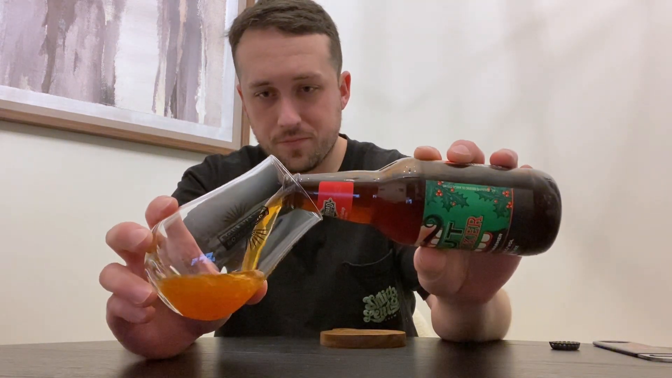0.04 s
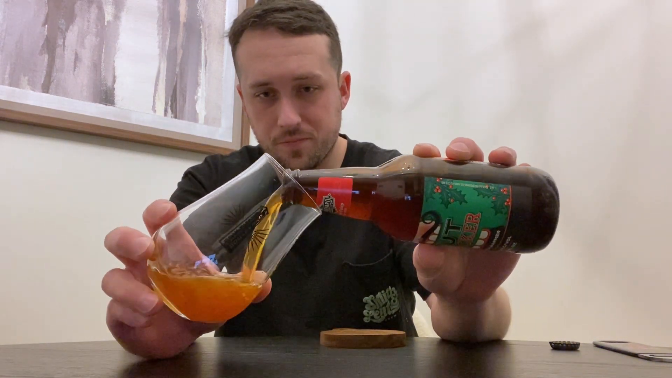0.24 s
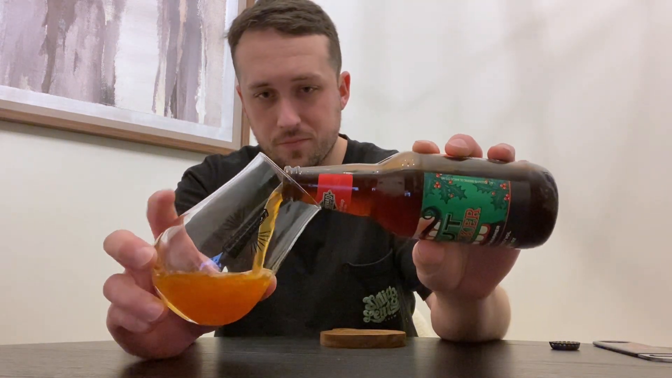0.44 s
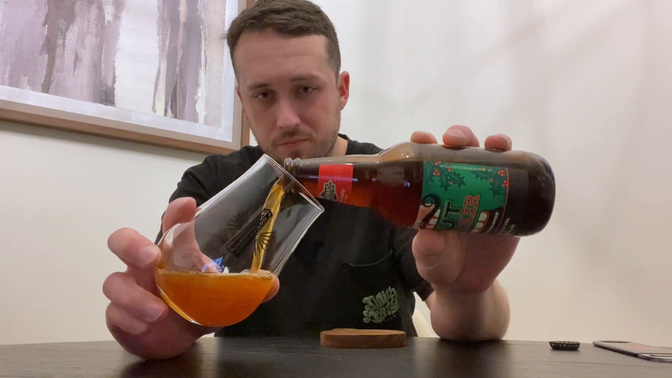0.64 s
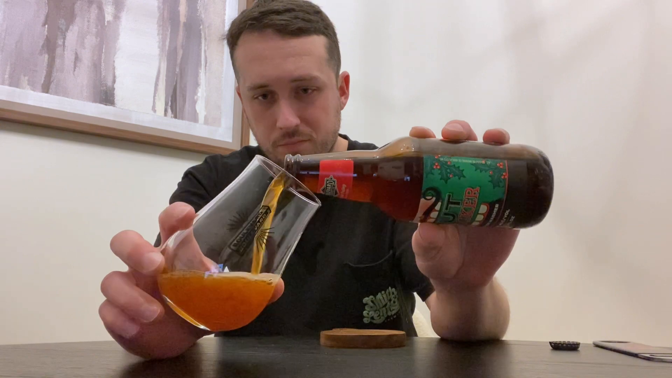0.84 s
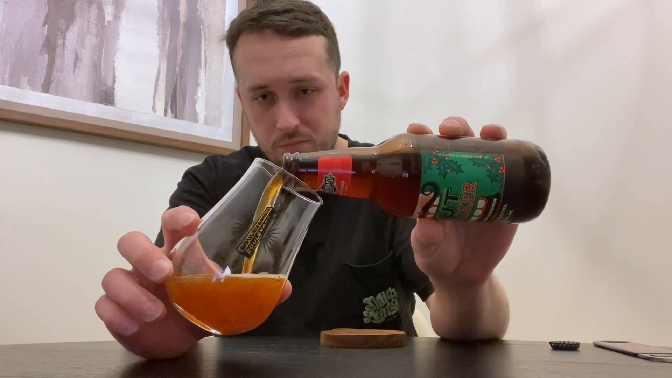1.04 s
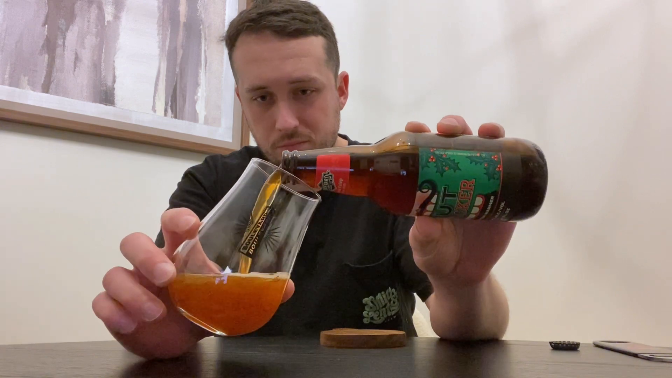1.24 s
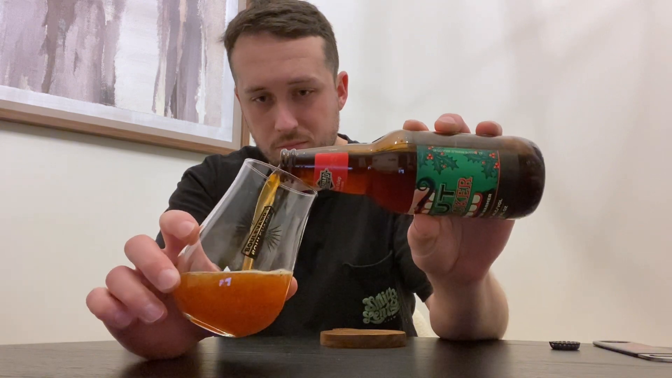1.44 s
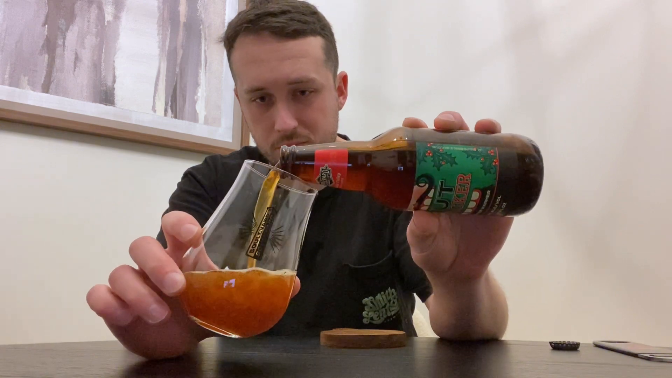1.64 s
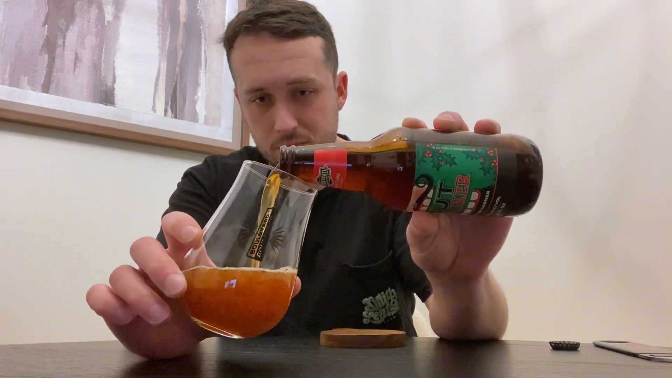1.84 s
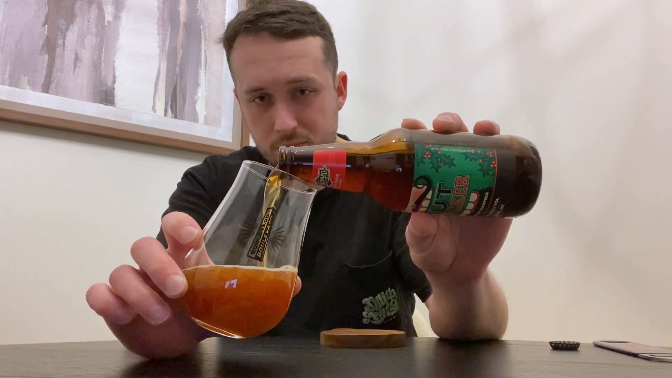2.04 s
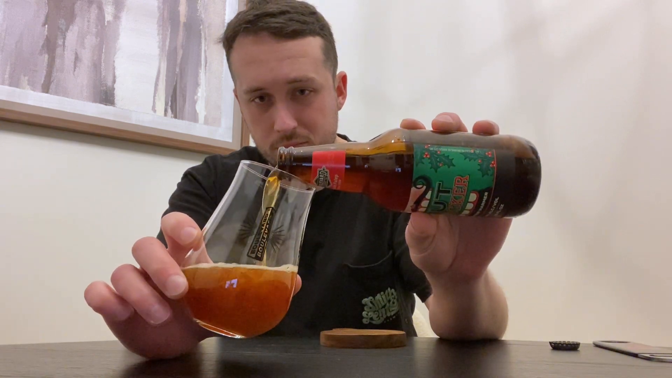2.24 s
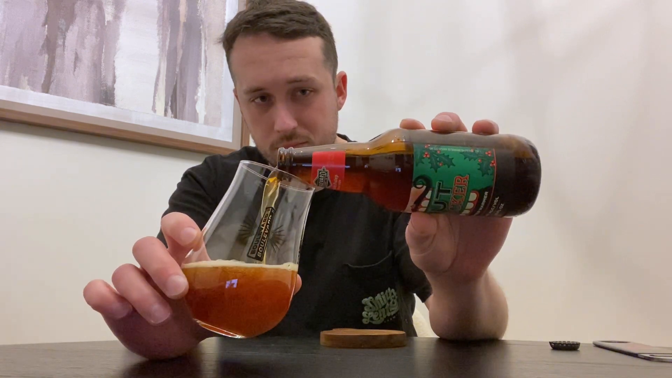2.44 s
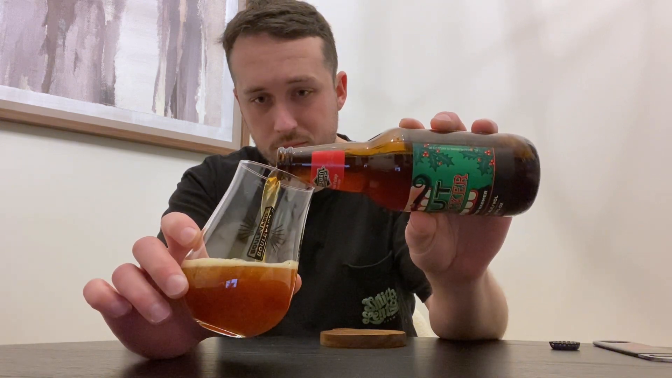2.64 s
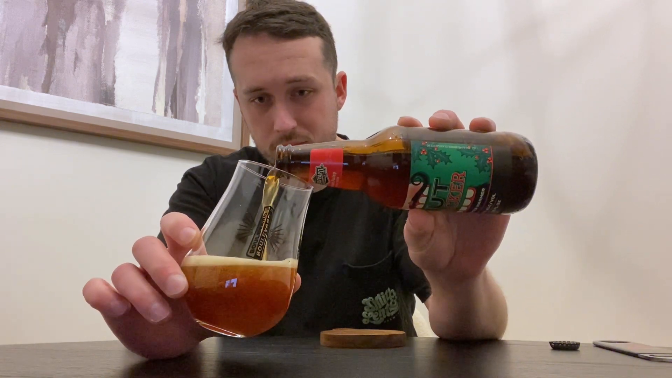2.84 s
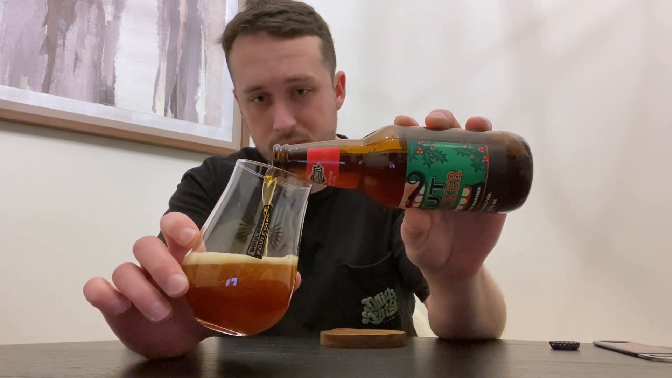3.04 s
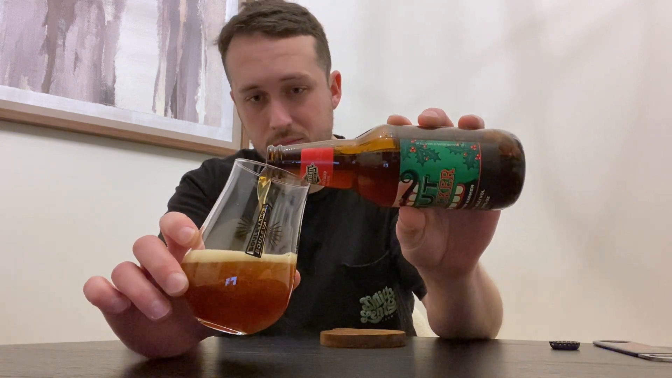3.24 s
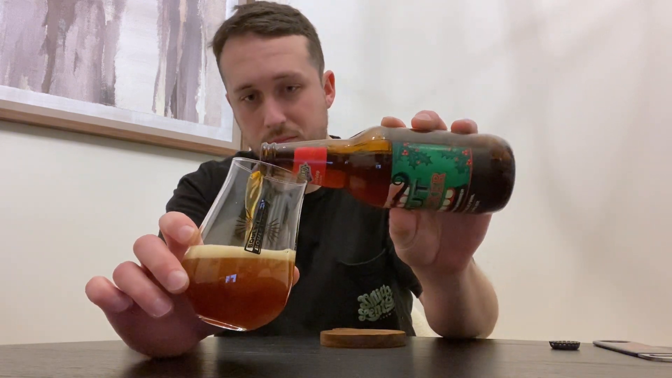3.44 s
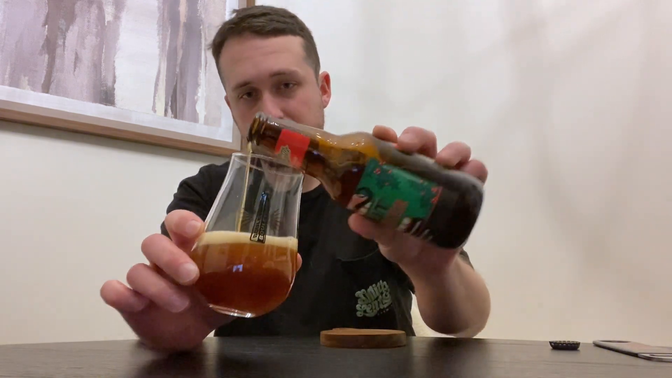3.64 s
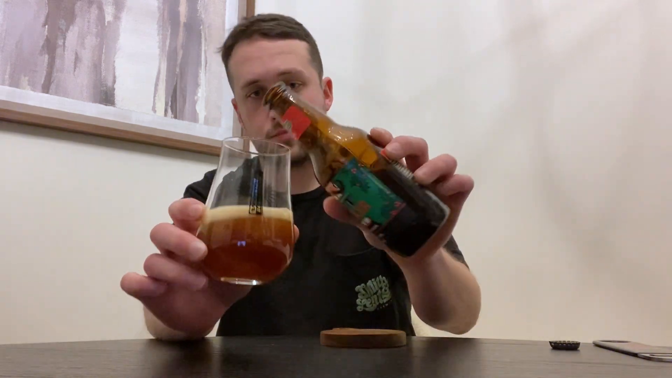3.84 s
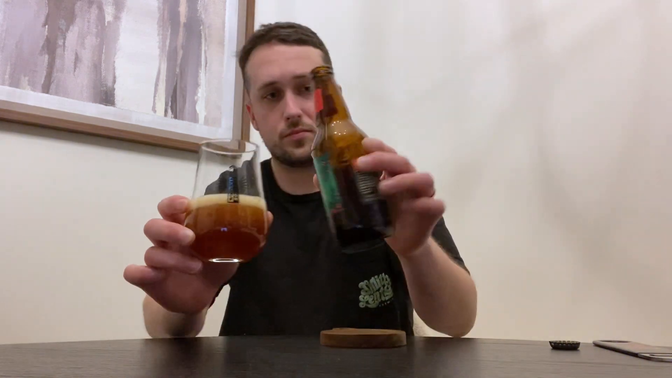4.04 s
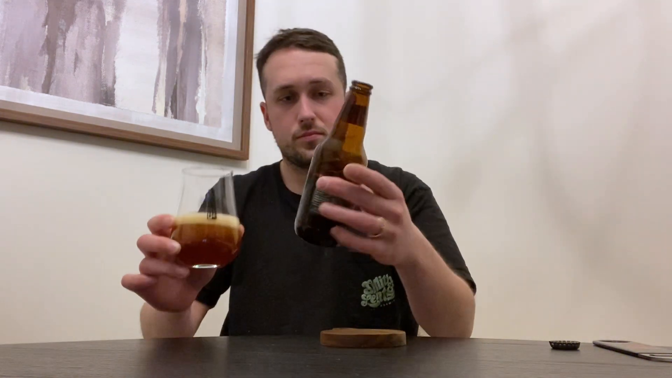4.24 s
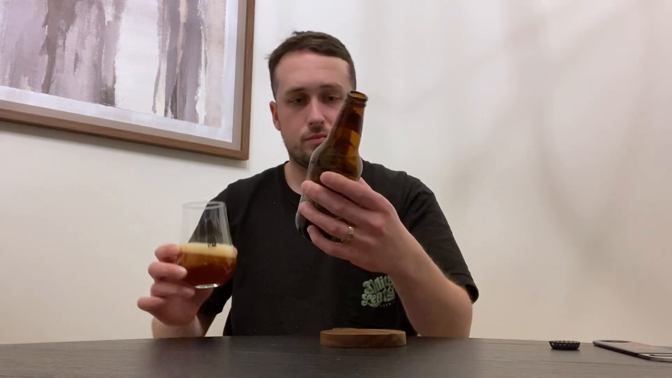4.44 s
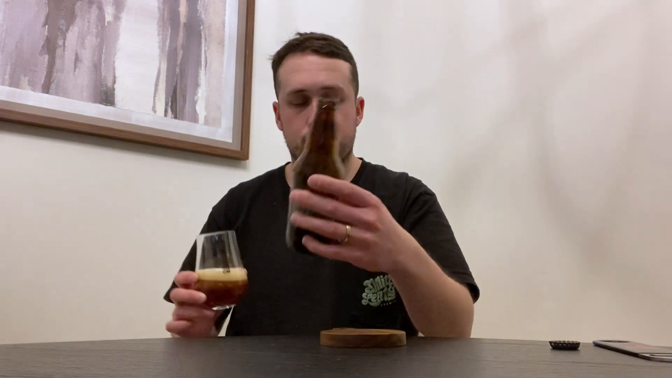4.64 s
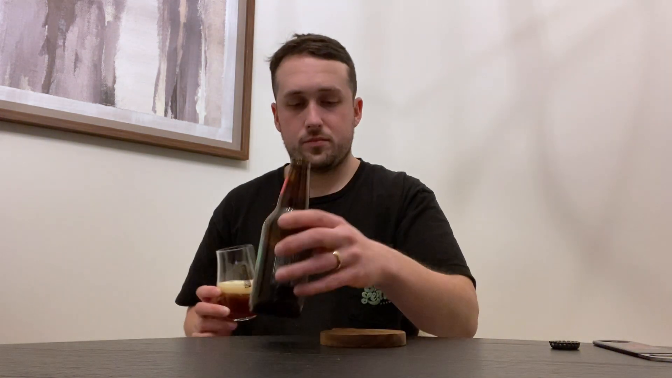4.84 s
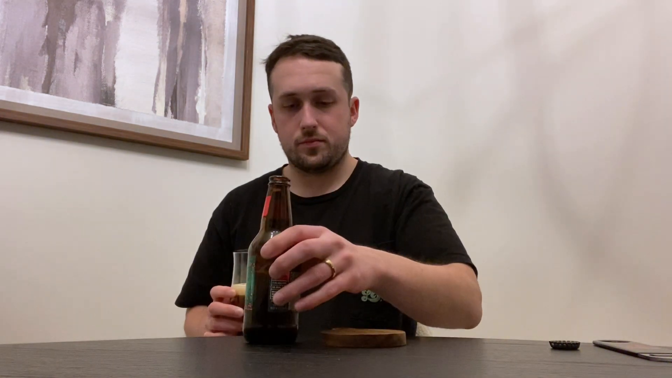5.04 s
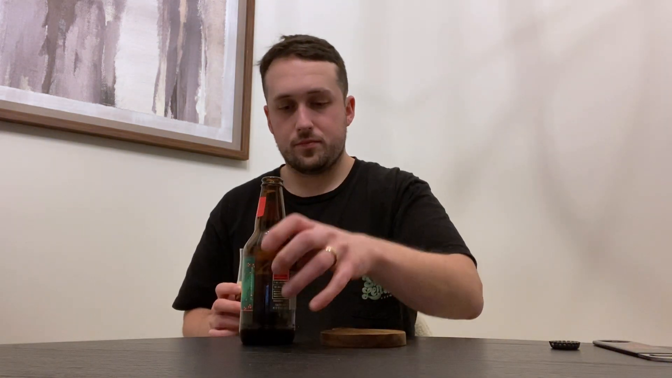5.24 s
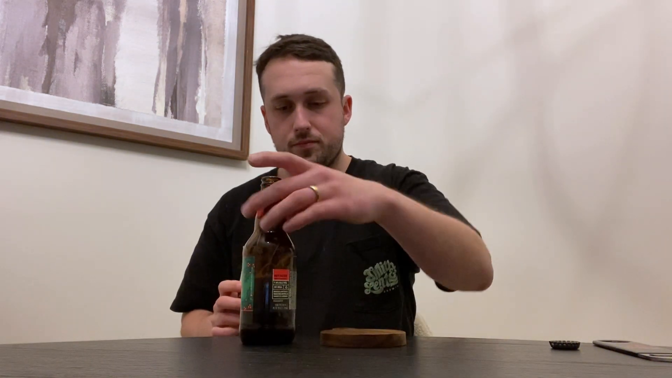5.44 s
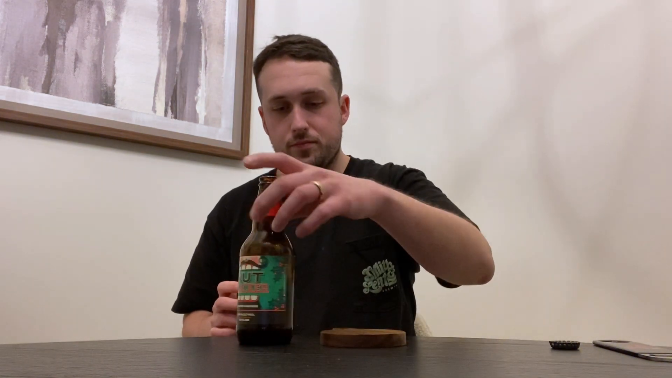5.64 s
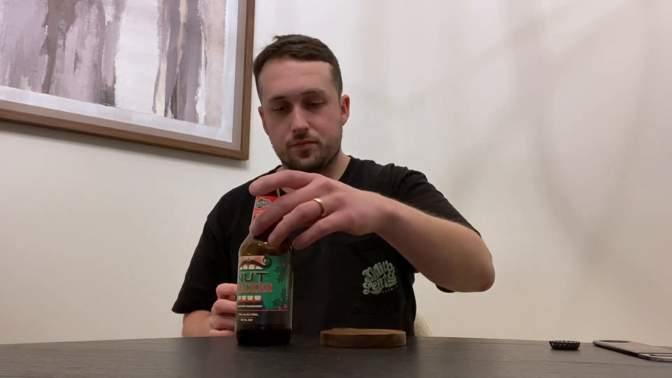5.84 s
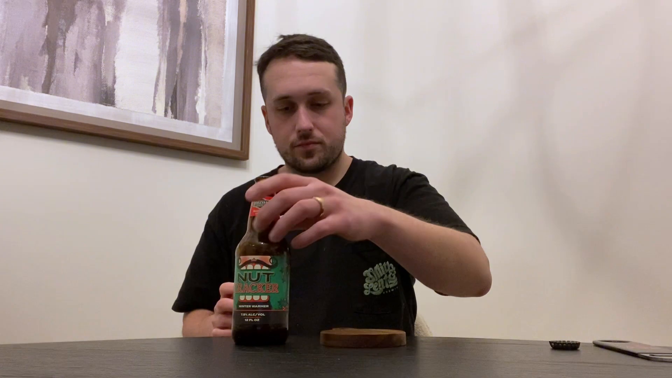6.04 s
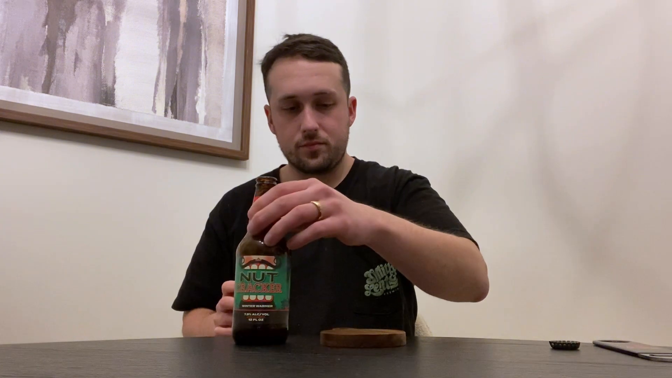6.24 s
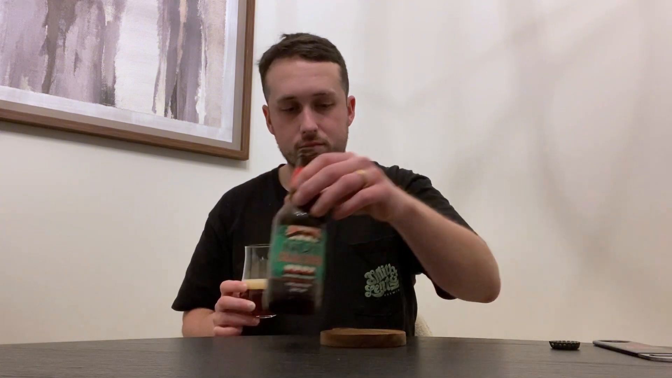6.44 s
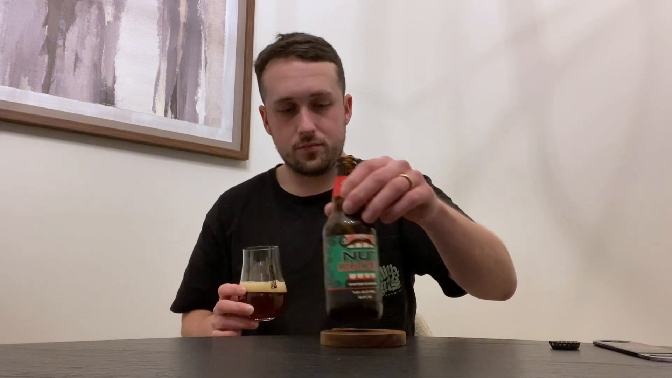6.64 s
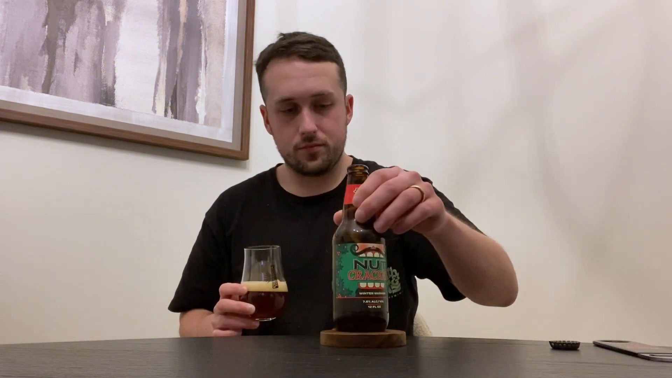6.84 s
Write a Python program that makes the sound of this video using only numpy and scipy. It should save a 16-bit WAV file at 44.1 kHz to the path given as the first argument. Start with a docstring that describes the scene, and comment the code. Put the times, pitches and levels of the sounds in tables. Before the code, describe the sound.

A small, quiet room with soft low room tone and a faint wavering appliance hum, heard by two close microphones. From 0 to 3.5 seconds beer trickles unevenly from a bottle into a glass: hollow glugs around the middle pitch, light wet splashes and, mostly in the first second, tiny high plinks on the glass wall. The flow is sparser after one second; from about 2.1 there are livelier, wetter plops, higher in pitch near 2.7. At 3.65 the neck clinks hard on the rim, a short bright ring with tiny rebounds, then a faint hiss until about 4.1. Near quiet follows. At 5.0 to 5.2 the bottle knocks and rattles on the wooden table; around 5.5 to 5.7 it drags with a low shuddering groan and glassy rasp, then softer scuffs and bumps until 6.3. At 6.8 it lands on a coaster with a loud, dry woody thump and glassy crack, dying quickly into the hum.

```python
"""Beer poured in a small room

Close by, beer trickles from a bottle into a glass: bubbles sound its air space and drops ring its wall.
The neck clinks on the rim as decaying modes; a hiss of shaped noise follows and stops short.
The bottle knocks, drags and shudders on a wooden table (pulses and stick-slip clicks into modes), then
lands on a coaster. A short room tail, room tone and an appliance hum lie behind, in two microphones."""
import sys
import numpy as np
from scipy import signal
from scipy.fft import rfft, irfft
from scipy.io import wavfile
from scipy.ndimage import uniform_filter1d

SR = 44100
rng = np.random.default_rng(int(sys.argv[2]) if len(sys.argv) > 2 else 0)


def wav_out(sig):
    """Save sig, one row per channel (or a flat mono array), as 16-bit PCM at SR to the path in sys.argv[1]."""
    wavfile.write(sys.argv[1], SR, np.round(np.clip(np.atleast_2d(sig).T, -1, 1) * 32767).astype(np.int16))


N = 304385  # samples

# room tone spectrum, before levelling: f/Hz, density/dB
AIR_SPECTRUM = [(15, -37), (25, -18.5), (54, -10), (164, -3.5), (219, 3), (278, -10.5), (436, -4),
                (498, -12.5), (616, -12.5), (761, -21), (1730, -28.5), (2500, -42), (8470, -55),
                (10500, -65.5), (14000, -83)]
AIR_DB = -46.5  # rms over both microphones
# likeness of the room tone at the two microphones: f/Hz, likeness/1
AIR_LIKENESS = [(60, 0.92), (150, 1), (300, 0.38), (500, 0.021), (6000, 0.028), (8300, 1)]
# lean of the room tone: f/Hz, left minus right/dB
AIR_LEAN = [(60, -5), (230, 2), (910, -1.5), (3550, -3), (13800, 1)]
# appliance hum lines, before they waver: f/Hz, rms level/dB, left minus right/dB, lead of right/rad
HUM_LINES = [(57.8, -55, 1.5, 0.27), (54.2, -66, -9, 1.5), (87.6, -64.5, -4, -0.016),
             (106.8, -58.5, 0, 1.1), (134.6, -56, -0.5, 0.055), (177, -60.5, 5, 0.62),
             (218.7, -57, -7, 1.56), (214.7, -51.5, -7.5, 0.89), (271, -59.5, 6.5, 0.72),
             (325.6, -58, -13, -0.24), (378.3, -60.5, -9.5, 1.3), (433.6, -60.5, -14.5, 0.18),
             (653, -64.5, -6, -2.2)]

# the stream into the glass, before its spurts: t/s, gurgle level/dB, patter level/dB
POUR = [(0.0, -64, -58), (0.1, -74, -71), (0.25, -53.5, -61), (0.42, -68, -78), (0.55, -59, -68),
        (0.64, -63, -77), (0.73, -46, -66), (0.82, -72, -80), (0.92, -58, -65), (1.1, -70, -75.5),
        (1.3, -61, -74), (1.8, -71, -76), (2.1, -80, -80), (2.3, -80, -84), (2.75, -68, -80.5),
        (3.1, -71, -79), (3.25, -70, -75), (3.5, -63, -75.5)]
# glass wall under the stream: f/Hz, width/Hz, level/dB
GLASS_WALL = [(2250, 200, -4), (2690, 37, -2), (3000, 160, -0.5), (4000, 1500, -7), (4870, 140, -1),
              (5640, 310, 0), (6200, 380, -12), (7940, 760, -9.5)]
# glugs: t/s, level/dB, bubble f/Hz, t60/s
GLUGS = [(0.207, -49, 605, 0.43), (0.322, -28.5, 630, 0.1), (0.323, -38.5, 1073, 0.068),
         (0.477, -34, 653, 0.16), (0.57, -38, 667, 0.085), (0.572, -49, 1050, 0.047),
         (0.666, -43.5, 655, 0.077), (0.701, -35.5, 646, 0.29), (0.765, -51, 630, 0.11),
         (0.876, -45, 636, 0.34), (0.976, -44, 653, 0.046), (1.256, -44.5, 665, 0.066),
         (1.522, -37, 550, 0.039), (1.582, -38.5, 646, 0.049), (1.65, -44, 676, 0.027),
         (1.786, -31, 630, 0.014), (1.797, -33, 735, 0.022), (1.862, -36, 660, 0.01),
         (2.11, -30, 470, 0.046), (2.112, -40.5, 990, 0.022), (2.141, -38, 905, 0.029),
         (2.143, -33, 500, 0.036), (2.168, -33, 485, 0.032), (2.169, -38, 940, 0.014),
         (2.175, -35.5, 840, 0.053), (2.277, -43, 647, 0.1), (2.426, -36.5, 857, 0.056),
         (2.465, -37, 653, 0.038), (2.514, -31.5, 873, 0.029), (2.646, -42.5, 880, 0.053),
         (2.701, -34, 847, 0.057), (2.722, -37.5, 930, 0.033), (2.775, -42, 667, 0.034),
         (2.876, -34, 844, 0.043), (2.97, -30.5, 848, 0.032), (3.031, -49, 966, 0.11),
         (3.065, -33, 825, 0.013), (3.155, -41, 830, 0.069)]
# splashes: t/s, level/dB, centre f/Hz, level of the upper wall's ring/dB
SPLASHES = [(0.012, -73, 2500, -59.5), (0.148, -51.5, 2690, -84), (0.286, -61, 2660, -58),
            (0.477, -48.5, 2070, -86), (0.475, -47, 1340, -90), (0.205, -58, 2860, -83),
            (0.5528, -46.5, 2200, -72), (0.555, -47, 1360, -90), (0.578, -49, 2630, -77),
            (0.603, -53, 2690, -74), (0.682, -64, 2180, -76), (0.717, -56, 3160, -86),
            (0.761, -50, 2930, -81), (0.761, -58, 1740, -94), (0.869, -55, 2450, -79),
            (0.917, -58, 2830, -76), (1.1174, -56, 2250, -89), (1.193, -51, 3000, -91),
            (1.221, -57, 2950, -90), (1.24, -56, 2930, -90), (1.256, -52, 3000, -88),
            (1.268, -57, 3050, -90), (1.345, -62, 3000, -90), (1.3997, -59, 2120, -83),
            (1.455, -54, 2100, -90), (1.835, -54, 2500, -92), (2.1102, -38.5, 2620, -56),
            (2.148, -61, 2700, -85), (2.178, -59, 2700, -87), (2.195, -51, 2730, -85),
            (2.205, -62, 2700, -88), (2.2237, -53, 2930, -79), (2.231, -57, 3100, -86),
            (2.277, -53, 2720, -90), (2.293, -62, 2870, -90), (2.31, -62, 2750, -90),
            (2.431, -48, 2820, -62), (2.464, -54, 2860, -85), (2.515, -44.5, 2560, -57),
            (2.645, -61, 3020, -79), (2.7214, -45, 2630, -75), (2.75, -58, 3000, -78),
            (2.772, -55, 2870, -86), (3.033, -55, 2680, -80), (3.065, -55, 2760, -66),
            (3.161, -60, 2570, -80), (3.337, -51, 2380, -72), (3.34, -61, 3330, -75)]
# plinks of single drops high on the wall: t/s, level/dB, f/Hz
PLINKS = [(.0373, -49, 6210), (.04, -62, 4950), (.0937, -65, 4940), (.1545, -56, 6200), (.1984, -58, 4920),
          (.2448, -55, 4950), (.2862, -59, 4900), (.297, -49, 6120), (.401, -67, 4870), (.405, -61, 6300),
          (.4863, -70, 6300), (.5127, -63, 6200), (.5526, -59, 4860), (.555, -62, 6240), (.5796, -49, 4960),
          (.6823, -50, 4910), (.685, -56, 6200), (.7213, -47, 4900), (.7677, -65, 6200), (.8475, -55, 4890),
          (.85, -53, 6100), (.9448, -54, 4970), (.9632, -59, 4990), (.9767, -49, 5000)]
PLINK_WIDTH_HZ, PLINK_T60_S, PLINK_TICK_DB = 200., .025, -8.5  # each starts with a wider, shorter tick
AIR_SPACE_HZ, FILL_HZ_PER_S = 633.3, 13.2  # the air space of the glass rises in pitch as it fills
RIGHTED_S, RIGHTED_HZ, RIGHTING_S = 2.7, 182, 0.05  # the pitch steps up when the glass is righted
SWAY = .025  # the surface heaves, so the pitch sways by this share (rms)
SPURT_DB, SPURTS_PER_S = 4, 13  # the stream comes unevenly (rms, fastest rate)
UPPER_PATTER_DB, UPPER_FADE_DB_PER_S = -76.5, 14  # drops reach the upper wall less as the glass is righted
GLIDE_PER_S, GLIDE_SCATTER = .2, .25  # rise in pitch of a bubble, and how it differs
# a smaller bubble of chance size pops with each glug
SIDE_BUBBLE_HZ, SIDE_BUBBLE_DB, SIDE_BUBBLE_T60_S, SIDE_SCATTER = 970, -29, 0.018, 0.093
# the wet plop around each bubble; plops grow wetter on foam
PLOP_DB, PLOP_T60_S, PLOP_WIDTH_HZ, PLOP_GAIN_DB_PER_S = -14, 0.035, 430, 1.5
# splashes grow shorter and brighter as the beer falls on foam
SPLASH_T60_S, SHORTEN_PER_S, SPRAY_DB, BRIGHTEN_DB_PER_S = 0.038, 0.27, -31.5, 5.5
SPLASH_RING_DB, SPLASH_RING_T60_S = -10.5, 0.062  # the wall mode nearest to a splash
UPPER_RING_T60_S = 0.16

# decay of the room: f/Hz, t60/s
ROOM_DECAY = [(120, 0.64), (330, 0.27), (870, 0.49), (2300, 0.49), (6000, 0.34), (12000, 0.094)]
# likeness of the tail at the two microphones: f/Hz, likeness/1
ROOM_LIKENESS = [(150, 0.8), (300, 0.32), (700, 0.068), (3000, 0.21)]
FAR_HZ = 1300.  # the treble of small sounds hardly reaches the walls
THUD_HZ = 1100.  # of the ringing modes mostly the low ones fill the room

# table top: f/Hz, level/dB, t60/s, left minus right/dB, lead of right/rad
TABLE_MODES = [(134.8, -17.5, 0.33, 7, 6.5), (198, -24, 0.51, 4.5, -23), (250.2, 1.5, 0.15, 0, 1),
               (275.8, 2, 0.082, 0.5, 0), (311.4, -2, 0.082, 5, -4.5), (344, -2.5, 0.074, -14, 1),
               (383.6, 0.5, 0.11, 4, 1.55), (427, -17, 0.56, -5, -6), (467, -6, 0.14, 10, 2),
               (489, -4, 0.13, -9.5, -3.5), (579.5, 4, 0.057, -9.5, 0.1), (608.7, 4.5, 0.04, 15.5, -1.6),
               (630, -6.5, 0.15, -4.5, 1.5), (719, 1, 0.088, 2.5, -2.5), (807, -13, 0.087, -2.5, 1.2),
               (56.6, -16.5, 0.3, -2, -5)]
# knocks on the table: t/s, blow level/dB, contact/ms, crack level/dB
KNOCKS = [(3.609, -21.5, 4.8, -89), (5.025, -7.5, 0.59, -16), (5.052, -24.5, 0.84, -26),
          (5.079, -26, 0.66, -36.5), (5.111, -30, 1.3, -37.5), (5.137, -25, 0.74, -35),
          (5.164, -13, 0.73, -8), (5.175, -9.5, 0.97, -16.5), (5.439, -20.5, 2.3, -27),
          (5.491, -13.5, 0.25, -5), (5.556, -17.5, 0.82, -11), (5.608, -11.5, 1.03, -25),
          (5.822, -19.5, 2.3, -39), (5.996, -10.5, 3.6, -41), (6.132, -23, 2, -41.5),
          (6.169, -19, 1.47, -31.5), (6.532, -48, 0.71, -43), (6.788, -44, 1.3, -29),
          (6.792, -36, 1.3, -17.5), (6.799, -7, 2.8, -1.5), (6.808, -4, 0.92, -1), (6.82, -12, 0.13, -30)]
# crowded upper modes of wood and bottle base: f/Hz, density/dB
GRAIN_SPECTRUM = [(500, -29.5), (850, -11), (939, 0.5), (1020, 9.5), (1270, 4), (1610, -6.5), (1950, -6),
                  (2430, -11.5), (2800, -18.5), (4050, -30), (4660, -35.5), (9300, -51.5), (12100, -80),
                  (20500, -120)]
# bottle base under a knock: f/Hz, width/Hz, level/dB
BOTTLE_BASE = [(1940, 150, 6), (2450, 140, -2.5)]
# bottle wall, as it rings in the catches before their scatter: f/Hz, width/Hz, level/dB
BOTTLE_WALL = [(3050, 1500, 0.5), (3500, 460, -6), (4030, 100, 0.5), (4700, 1100, -8.5), (5220, 210, -4),
               (5500, 360, -5), (6130, 130, -13), (6370, 400, -13), (8500, 250, -19)]
# one list for each drag over the wood: t/s, pressure level/dB, grit level/dB
DRAGS = [
    [(5.03, -28.5, -54.5), (5.07, -25.5, -52), (5.09, -51, -64.5), (5.135, -39, -54.5), (5.165, -15.5, -44),
     (5.181, -25, -44.5), (5.241, -40.5, -56.5), (5.3, -45, -55.5)],
    [(5.43, -46, -54), (5.486, -27, -49.5), (5.508, -14.5, -27), (5.53, -15.5, -28), (5.57, -16, -29.5),
     (5.598, -18.5, -31.5), (5.61, -9.5, -30.5), (5.636, -23.5, -40), (5.694, -33, -53), (5.79, -48.5, -59)],
    [(5.81, -30, -51), (5.828, -29, -42), (5.868, -24.5, -39.5), (5.9, -33.5, -51.5), (5.94, -23.5, -46),
     (5.96, -40, -58), (5.99, -29, -49.5), (6.026, -37, -58), (6.09, -51.5, -78)],
    [(6.12, -41.5, -57.5), (6.138, -37, -64.5), (6.208, -36, -45), (6.24, -36, -67.5), (6.28, -51, -69)],
]
# shudders, when the slips lock to the main mode of the top: middle t/s, length/s, level/dB
SHUDDERS = [(5.043, 0.062, -26.5), (5.079, 0.032, -23), (5.14, 0.052, -32.5), (5.183, 0.056, -17),
            (5.219, 0.048, -25.5), (5.27, 0.037, -31), (5.457, 0.047, -26.5), (5.512, 0.048, -20),
            (5.559, 0.065, -14.5), (5.611, 0.043, -13.5), (5.65, 0.044, -19.5), (5.728, 0.072, -25.5),
            (5.842, 0.046, -27), (5.887, 0.064, -24), (5.953, 0.082, -27), (6.022, 0.053, -26),
            (6.157, 0.1, -34), (6.213, 0.067, -24)]
CHATTER_HZ, CHATTER_DRIFT_HZ = 254.4, 9.  # main mode of the top, and its rms drift
BASE_DB, BASE_PER_CRACK = -28.5, 0.63  # the bottle base rings with the crack
RASP_DB, RASP_PER_GRIT = -10.5, 1.5  # the glass rasps where the grit is strong
WALL_PER_BASE_DB = -26  # knocks ring the bottle wall too
WALL_WIDENING = 2.5  # wall modes are wider and die faster under rasp and knocks than in the catches

# clink of neck on rim: t/s, ring level/dB, shiver level/dB
CLINK_BLOWS = [(3.654, -8, -17.5), (3.6665, -18, -37), (3.692, -36, -40), (3.718, -45, -44),
               (3.745, -36.5, -52), (3.779, -39, -56)]
# modes of the clink: f/Hz, level/dB, t60/s
CLINK_MODES = [(135.6, -20.5, 0.24), (492, -3.5, 0.069), (555, -4, 0.056), (646, -7.5, 0.088),
               (895, -10, 0.061), (980, -14, 0.11), (1064, -5, 0.039), (1145, 1.5, 0.026),
               (1440, -1.5, 0.019), (1730, -5, 0.022), (1850, -4.5, 0.013), (2450, -11.5, 0.057),
               (2460, -33, 0.55), (2370, -25, 0.18), (2150, -35, 0.13), (2690, -23, 0.15),
               (3515, -7.5, 0.028), (3570, -40, 0.1), (3450, -37, 0.23), (4095, -16, 0.093),
               (4150, -25, 0.31), (4430, -29, 0.24), (5040, -8, 0.055), (5550, -8, 0.02),
               (6400, -49, 0.046), (6500, -27, .05), (7200, -32, 0.047), (9120, -28, 0.05),
               (11700, -40, 0.036), (12400, -28, 0.046)]
# moving beer makes each mode of the glass flutter, low modes less
SLOSH, SLOSH_SETS_IN_S, SLOSH_S, SLOSH_ABOVE_HZ = .9, .015, .009, 900.
# hiss while the bottle tips back: t/s, level/dB
HISS = [(3.7, -56), (3.85, -56.5), (4.02, -56.5), (4.045, -66), (4.2, -77)]
# colour of the hiss: f/Hz, density/dB
HISS_COLOUR = [(410, -30), (700, 1.5), (864, -2.5), (2380, -3.5), (2600, -12), (3420, -8), (5900, -22),
               (8200, -19), (10200, -32), (13500, -39)]

# dry ticks as fingers shift on the glass: t/s, level/dB, f/Hz
TICKS = [(5.427, -60.5, 4120), (5.459, -56, 4700), (5.782, -66.5, 4700), (5.792, -63.5, 4700),
         (6.12, -71, 4630), (6.133, -72, 4500)]
# drag catches, then the landing on the coaster, ring the bottle wall: t/s, level/dB
CATCHES = [(5.496, -51), (5.506, -51), (5.524, -49), (5.537, -48), (5.55, -41.5), (5.558, -39), (5.59, -53),
           (5.611, -36), (6.8036, -32), (6.808, -25.5), (6.809, -32), (6.8163, -40), (6.821, -45)]
CATCH_SCATTER_DB = 2.5  # each row favours other modes
CATCH_DETUNE = .025  # grip and tilt shift the modes a little from row to row
# blows on the coaster: t/s, ring level/dB, shiver level/dB
COASTER_BLOWS = [(6.7995, 0, -41.5), (6.805, -17, -16), (6.820, -43, -34)]
# modes of the coaster: f/Hz, level/dB, t60/s
COASTER_MODES = [(414, -5.5, 0.021), (551, 6.5, 0.021), (736, -11.5, 0.048), (1050, -23, 0.066),
                 (2040, 3, 0.0072)]

EDGE_HZ = 14100  # upper band limit
SIDES = np.array([[.5], [-.5]])  # left, right


def amp(db):
    """dB to gain."""
    return 10 ** (np.asarray(db) / 20)


def evened(x):
    """Scales to rms 1."""
    return x / np.sqrt(np.mean(x ** 2) + 1e-20)


def read(points, hz):
    """Reads a table on a log-frequency axis."""
    f, value = np.transpose(points)
    return np.interp(np.log(hz + 1), np.log(f + 1), value)


def curve(rows):
    """A gate that is 1 inside the table, then its columns at every sample."""
    s, *columns = np.transpose(rows)
    t = np.arange(N) / SR
    gate = uniform_filter1d(1. * ((t > s[0]) & (t < s[-1])), 200)
    return [gate] + [np.interp(t, s, c) for c in columns]


def add(mix, s, sound):
    """Mixes a sound in at s seconds."""
    part = mix[round(s * SR):][:len(sound)]
    part += sound[:len(part)]


def resonate(x, hz, width):
    """Shifts hz down to zero, smooths, shifts back: a resonance of gain 1."""
    turn = np.exp(2j * np.pi * np.cumsum(hz * np.ones(len(x))) / SR)
    r = np.exp(-np.pi * width / SR)
    return 2 * (turn * signal.lfilter([1 - r], [1, -r], x / turn)).real


def resonate_twice(x, hz, width):
    """Two equal resonances in a row give steeper skirts."""
    return resonate(resonate(x, hz, width), hz, width)


def ring(modes, rise_s=0.003, flutter=0):
    """Impulse response of decaying modes with a soft start, peak 1; flutter roughens the tail."""
    t, x = np.arange(SR // 2) / SR, 0
    smooth = int(SLOSH_S * SR)
    for hz, db, t60 in modes:
        share = flutter * (1 - np.exp(-t / SLOSH_SETS_IN_S)) / (1 + (SLOSH_ABOVE_HZ / hz) ** 2)
        chance = 0
        if flutter:
            noise = rng.standard_normal(len(t))
            chance = evened(uniform_filter1d(uniform_filter1d(noise, smooth), smooth))
        tone = amp(db - 60 * t / t60) * np.sin(2 * np.pi * hz * t)
        x = x + tone * (1 - share + share * chance)
    x *= 1 - np.exp(-t / rise_s)
    return x / abs(x).max()


def ring_of_peaks(peaks):
    """Ring of modes given by width: a wider mode dies faster."""
    return ring([(hz, db + 20 * np.log10(width), 2.2 / width) for hz, width, db in peaks], .0008)


def grains(per_s, spread_db):
    """Random clicks, a few of them large."""
    size = amp(spread_db * np.minimum(rng.exponential(1, N), 4)) * rng.choice([-1., 1.], N)
    return evened(size * (rng.random(N) < per_s / SR))


def wander(per_s):
    """Slow chance of rms 1, a sum of sines up to per_s."""
    t = np.arange(N // 64 + 2) * 64 / SR
    rates = np.geomspace(per_s / 15, per_s, 16)
    x = sum(np.sin(2 * np.pi * (f * t + rng.random())) / np.sqrt(f) for f in rates)
    return np.interp(np.arange(N) / SR, t, evened(x))


def puffs(rows, width_hz, t60):
    """Each row is a brief puff of noise in one resonance."""
    out, t = np.zeros(N), np.arange(1500) / SR
    for s, db, hz in rows:
        noise = rng.standard_normal(len(t))
        add(out, s, amp(db - 60 * t / t60) * evened(resonate_twice(noise, hz, width_hz)))
    return out


def air():
    """Room tone: random short-time spectra with faint patches."""
    frames, hz = N // 512 + 5, np.fft.rfftfreq(2048, 1 / SR)
    a, b, c, d, patches = rng.standard_normal((frames, 1025, 5)).T
    patches = evened(uniform_filter1d(uniform_filter1d(patches, 20, 0), 6, 1))
    same = np.clip(read(AIR_LIKENESS, hz), -1, 1)[:, None]
    left = a + 1j * b
    right = same * left + np.sqrt(1 - same ** 2) * (c + 1j * d)
    lean = read(AIR_LEAN, hz)[:, None] / 2
    z = np.array([left * amp(lean), right * amp(-lean)])
    z *= amp(read(AIR_SPECTRUM, hz)[:, None] + 1.72 * patches)
    return amp(AIR_DB) * evened(signal.istft(z, nperseg=2048, noverlap=1536)[1][:, :N])


def hum():
    """Appliance lines that waver in level and phase."""
    t, out = np.arange(N) / SR, np.zeros((2, N))
    for hz, db, lean_db, lead in HUM_LINES:
        turn = 2 * np.pi * hz * t + 0.75 * wander(7.)
        level = amp(db + SIDES * lean_db + 1.54 * wander(6.)) * np.sqrt(2)
        out += level * np.sin(turn - SIDES * lead)
    return out


def gurgle():
    """Small bubbles sound the air space of the glass, whose pitch rises as it fills."""
    t = np.arange(N) / SR
    hz = AIR_SPACE_HZ + FILL_HZ_PER_S * t + RIGHTED_HZ / (1 + np.exp((RIGHTED_S - t) / RIGHTING_S))
    hz *= 1 + SWAY * wander(SPURTS_PER_S)
    return evened(resonate(resonate(grains(700., 0.84), hz, 45.0), hz, 120.0))


def patter():
    """Drops on the lower and upper glass wall; each lands where it rings mostly one mode."""
    drops = []
    for hz, width, db in GLASS_WALL:
        clicks = resonate(grains(90., 3.5), hz, width)
        drops.append(amp(db) * evened(resonate(clicks, hz, 400. + width)))
    return evened(sum(drops[:4])), evened(sum(drops[4:]))


def upper_level():
    """Level of the upper wall: a fading patter, and a decaying burst at each splash."""
    level = amp(UPPER_PATTER_DB - UPPER_FADE_DB_PER_S * np.arange(N) / SR)
    t = np.arange(SR // 8) / SR
    for s, _, _, wall_db in SPLASHES:
        add(level, s, amp(wall_db - 60 * t / UPPER_RING_T60_S))
    return level


def plinks():
    """Single drops high on the wall: a narrow puff of noise under a wider tick."""
    tick = puffs(PLINKS, 2200., .012)
    return puffs(PLINKS, PLINK_WIDTH_HZ, PLINK_T60_S) + amp(PLINK_TICK_DB) * tick


def glugs():
    """Decaying bubble tones, most rising a little as they near the surface, each in a wet plop."""
    out, t = np.zeros(N), np.arange(SR // 8) / SR
    for s, db, hz, t60 in GLUGS:
        size, glide = rng.standard_normal(2)
        side_hz = SIDE_BUBBLE_HZ * (1 + SIDE_SCATTER * size)
        bent = t + (GLIDE_PER_S + GLIDE_SCATTER * glide) * t ** 2
        bubble = np.sin(2 * np.pi * hz * bent) * amp(-60 * t / t60)
        side = np.sin(2 * np.pi * side_hz * bent) * amp(SIDE_BUBBLE_DB - 60 * t / SIDE_BUBBLE_T60_S)
        add(out, s, amp(db) * (bubble + side) * (1 - np.exp(-t / 0.0022)))
        plop = evened(resonate_twice(rng.standard_normal(len(t)), hz, PLOP_WIDTH_HZ))
        add(out, s, amp(db + PLOP_DB + PLOP_GAIN_DB_PER_S * s - 60 * t / PLOP_T60_S) * plop)
    return out


def splashes():
    """Decaying noise with a bright spray and a landing tick; some ring the wall mode nearest to them."""
    out, t = np.zeros(N), np.arange(SR // 8) / SR
    for s, db, hz, _ in SPLASHES:
        noise = rng.standard_normal(len(t))
        low = evened(resonate(resonate(noise, hz, 230.0), hz, 930.0))
        spray = evened(resonate_twice(noise, 7500.0, 2200.0))
        t60 = SPLASH_T60_S * np.exp(-SHORTEN_PER_S * s)
        add(out, s, amp(db - 60 * t / t60) * (low + amp(SPRAY_DB + BRIGHTEN_DB_PER_S * s) * spray))
        tick = resonate_twice(noise, 2000., 4000.) * np.exp(-t / 0.0037)
        add(out, s, amp(db - 16.5) * tick)
        mode_hz = min((f for f, _, _ in GLASS_WALL), key=lambda f: abs(f - hz))
        if abs(mode_hz / hz - 1) < .1:
            decay = amp(db + SPLASH_RING_DB - 60 * t / SPLASH_RING_T60_S)
            add(out, s, decay * np.sin(2 * np.pi * mode_hz * t))
    return out


def pour():
    """The stream into the glass: gurgle and patter in spurts, with plinks, glugs and splashes."""
    gate, gurgle_db, patter_db = curve(POUR)
    spurts = amp(SPURT_DB * wander(SPURTS_PER_S))
    lower, upper = patter()
    out = gate * spurts * (amp(gurgle_db) * gurgle() + amp(patter_db) * lower)
    out += gate * upper_level() * upper
    out += plinks() + glugs() + splashes()
    # little is left in the top treble
    return signal.sosfilt(signal.butter(N=6, Wn=9300., fs=SR, output="sos"), out)


def room(x):
    """Sparse taps of random sign, each band dying at its own speed."""
    taps = np.zeros((2, SR // 2))
    at = np.arange(200, SR // 2 - 20, 20) + rng.integers(0, 20, (2, (SR // 2 - 201) // 20))
    np.put_along_axis(taps, at, rng.choice([-1., 1.], at.shape), 1)
    hz, t, z = signal.stft(taps, SR, nperseg=256)
    same = np.clip(read(ROOM_LIKENESS, hz), 0, 1)[:, None]
    z[1] = same * z[0] + np.sqrt(1 - same ** 2) * z[1]
    decay = amp(-60 * t / read(ROOM_DECAY, hz)[:, None])
    tail = signal.istft(z * decay, SR, nperseg=256)[1]
    return signal.fftconvolve(x[None], tail / np.linalg.norm(tail[0]), axes=1)[:, :N]


def grain():
    """Response of one spot of the top: crowded modes, soft start, quick decay."""
    t = np.arange(SR // 5) / SR
    chance = rng.standard_normal((2, len(t))) + 0.51 * rng.standard_normal(len(t))
    x = irfft(rfft(chance) * amp(read(GRAIN_SPECTRUM, np.fft.rfftfreq(len(t), 1 / SR))))
    x *= amp(-60 * t / 0.064) * (1 - np.exp(-t / 0.00039)) ** 2
    return x / np.linalg.norm(x[0])


def shudders():
    """Slips locked to the main mode of the top: a drifting tone that swells and fades."""
    swell = np.zeros(N)
    for s, length, db in SHUDDERS:
        add(swell, s - length / 2, amp(db) * np.hanning(int(length * SR)) ** 0.66)
    hz = CHATTER_HZ + CHATTER_DRIFT_HZ * wander(40.)
    locked = np.sqrt(2) * np.sin(2 * np.pi * np.cumsum(hz) / SR) * amp(1.1 * wander(30.))
    return swell * locked


def table():
    """Blows and stick-slip clicks push the table top, crack in its grain and ring the bottle."""
    push, rub, grit, glass, rasp = np.zeros((5, N))
    for s, db, ms, crack_db in KNOCKS:  # a longer contact gives a duller blow
        contact = np.hanning(int(ms * SR / 1000) + 3)
        add(push, s, amp(db) * contact / contact.sum())
        add(grit, s, amp([crack_db]))
        add(glass, s, amp([BASE_DB + BASE_PER_CRACK * crack_db]))
    slips, grits, rasps = grains(900., 2.8), grains(540.0, 3.26), grains(1200., 2.8)
    for rows in DRAGS:
        gate, db, grit_db = curve(rows)
        rub += gate * amp(db) * slips
        grit += gate * amp(grit_db) * grits
        rasp += gate * amp(RASP_DB + RASP_PER_GRIT * grit_db) * rasps

    t, modes = np.arange(SR // 2) / SR, []
    for hz, db, t60, lean_db, lead in TABLE_MODES:
        decay = amp(db + SIDES * lean_db - 60 * t / t60) * (1 - np.exp(-t / 0.0038))
        modes.append(decay * np.sin(2 * np.pi * hz * t - SIDES * lead))
    wood = sum(modes)
    dragged = wood - modes[2] - modes[3]  # the shudders play the two main modes under a drag
    blows = signal.oaconvolve(push[None], wood / abs(wood).max())[:, :N]
    rubbing = signal.oaconvolve(rub[None], dragged / np.linalg.norm(dragged[0]))[:, :N]

    spot = rng.integers(0, 5, N)  # the base meets the wood at changing spots
    cracks = sum(signal.oaconvolve((grit * (spot == k))[None], grain())[:, :N] for k in range(5))

    wall = ring_of_peaks([(hz, WALL_WIDENING * width, db) for hz, width, db in BOTTLE_WALL])
    wall_push = rasp / np.linalg.norm(wall) + amp(WALL_PER_BASE_DB) * glass
    bottle = signal.oaconvolve(glass + amp(-16.0) * rasp, ring_of_peaks(BOTTLE_BASE))[:N]
    bottle += signal.oaconvolve(wall_push, wall)[:N] + ticks()
    # a little nearer the right microphone: earlier and louder there
    bottle = np.array([np.roll(bottle, shift=2), bottle]) * amp([[-1.5], [1.5]])
    return blows + rubbing + shudders() + cracks + bottle


def strikes(blows, modes, rise_s, tick_db, shiver_t60, shiver_hz, flutter=0):
    """Each blow rings the modes, starts with a tick and shivers in modes too crowded to tell apart."""
    out, rough = np.zeros((2, N))
    body, t = ring(modes, rise_s, flutter), np.arange(SR // 5) / SR
    band = signal.butter(N=3, Wn=[1200., shiver_hz], btype="band", fs=SR, output="sos")
    for s, db, shiver_db in blows:
        noise = rng.standard_normal(len(t)) * (1 - np.exp(-t / rise_s))
        add(out, s, amp(db) * body)
        add(out, s, amp(db + tick_db) * np.gradient(noise) * np.exp(-t / 0.0003))
        add(rough, s, amp(shiver_db - 60 * t / shiver_t60) * signal.sosfilt(band, noise))
    return out, rough


def clink():
    """Neck on rim: glass modes that flutter with the moving beer, and their shiver."""
    return strikes(CLINK_BLOWS, CLINK_MODES, 0.0021, -25.0, 0.024, 6800.0, SLOSH)


def hiss():
    """Wide noise that stops short, partly alike at both microphones."""
    gate, db = curve(HISS)
    z = rfft(rng.standard_normal((2, N)) + 0.4 * rng.standard_normal(N))
    coloured = irfft(z * amp(read(HISS_COLOUR, np.fft.rfftfreq(N, 1 / SR))), N)
    return gate * amp(db) * evened(coloured)


def ticks():
    """Fingers shift on the glass: wide, short puffs of noise."""
    return puffs(TICKS, 900., 0.032)


def catches():
    """Drag catches, then the landing on the coaster, ring the bottle wall, each in its own mix of modes."""
    out = np.zeros(N)
    for s, db in CATCHES:
        modes = []
        for hz, width, mode_db in BOTTLE_WALL:
            mix, shift = rng.standard_normal(2)
            modes.append((hz * (1 + CATCH_DETUNE * shift), width, mode_db + CATCH_SCATTER_DB * mix))
        add(out, s, amp(db) * ring_of_peaks(modes))
    return out


def coaster():
    """Bottle on coaster: short, low modes and their shiver."""
    return strikes(COASTER_BLOWS, COASTER_MODES, 0.0034, -55.0, 0.037, 4930.0)


def scene():
    """Close sounds, their room tail and the background."""
    beer, wood, caught = pour(), table(), catches()
    clink_ring, clink_shiver = clink()
    coaster_ring, coaster_shiver = coaster()
    close = np.array([beer, clink_ring + clink_shiver, coaster_ring + coaster_shiver])
    # these reach the left microphone a little later
    left = amp([-1.2, -.7, -1.1]) @ np.roll(close, shift=4, axis=1)
    right = amp([1.2, .7, 1.1]) @ close

    dulled = signal.lfilter(*signal.butter(N=1, Wn=FAR_HZ, fs=SR), beer)
    low_rings = amp(-12.0) * clink_ring + amp(-13.0) * coaster_ring
    thud = signal.lfilter(*signal.butter(N=2, Wn=THUD_HZ, fs=SR), low_rings)
    to_walls = amp(-6.5) * dulled + amp(-10.5) * wood.mean(0) + thud
    to_walls += amp(-26.0) * clink_ring + amp(-6.5) * clink_shiver + amp(-13.0) * coaster_shiver
    far = room(to_walls)

    near = np.array([left, right]) + wood + caught * amp([[-1.5], [1.5]])
    # small things radiate little deep bass
    bass_cut = signal.butter(N=2, Wn=45., btype="high", fs=SR, output="sos")
    return signal.sosfilt(bass_cut, near + far) + hiss() + air() + hum()


def record(dry):
    """The loudest peaks are rounded off; then the band limit."""
    rounded = dry / (1 + abs(dry / .95) ** 4) ** (1 / 4)
    lowpass = signal.firwin(511, EDGE_HZ, window=("kaiser", 9), fs=SR)
    return signal.oaconvolve(rounded, lowpass[None], "same")


dry = scene()
out = record(dry)
wav_out(out)
```